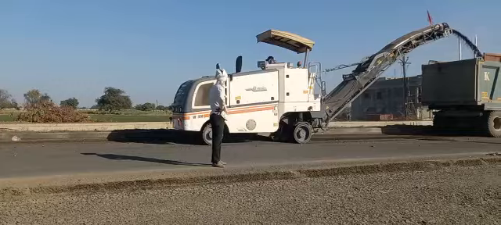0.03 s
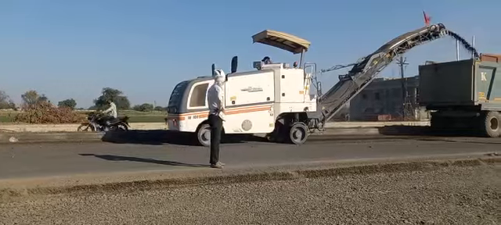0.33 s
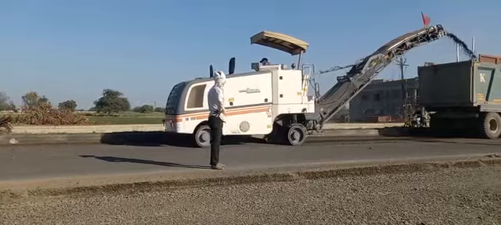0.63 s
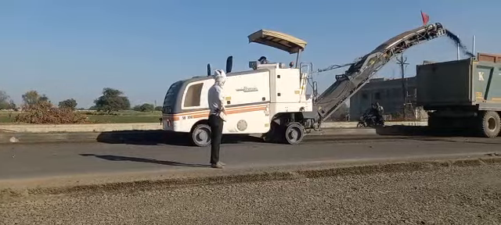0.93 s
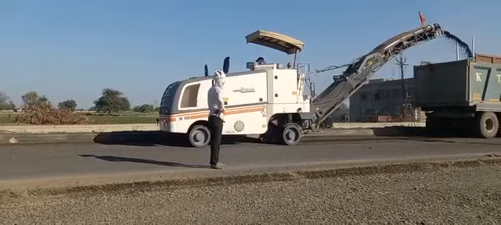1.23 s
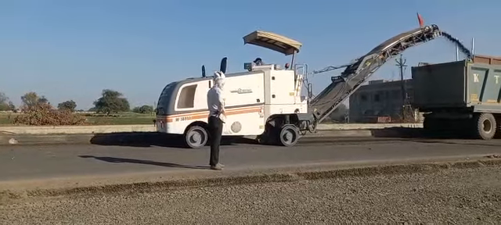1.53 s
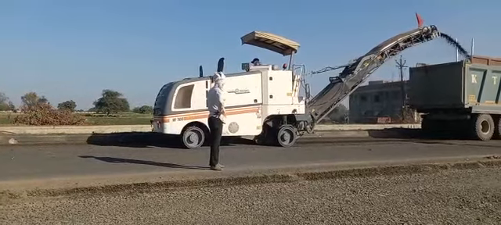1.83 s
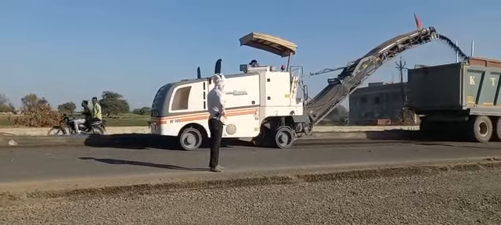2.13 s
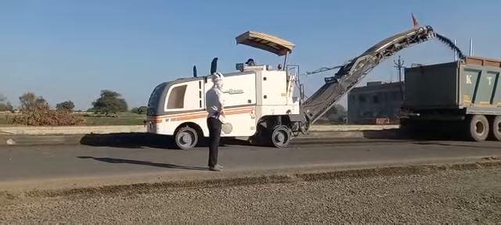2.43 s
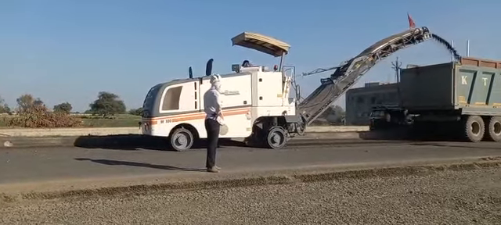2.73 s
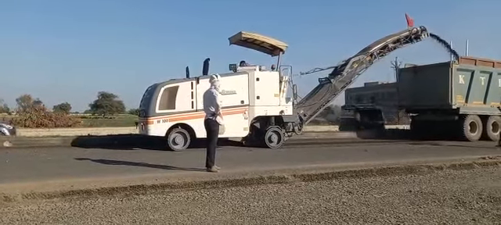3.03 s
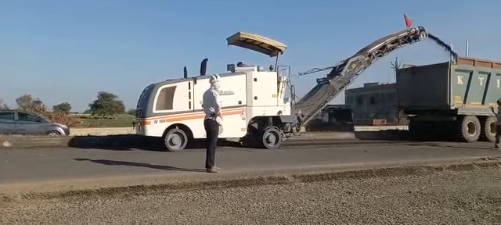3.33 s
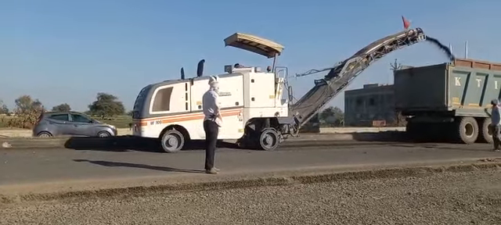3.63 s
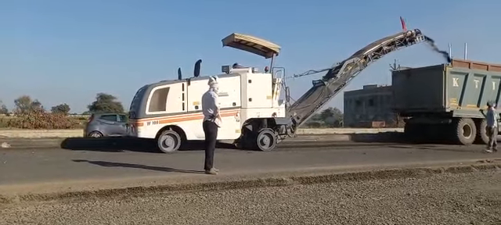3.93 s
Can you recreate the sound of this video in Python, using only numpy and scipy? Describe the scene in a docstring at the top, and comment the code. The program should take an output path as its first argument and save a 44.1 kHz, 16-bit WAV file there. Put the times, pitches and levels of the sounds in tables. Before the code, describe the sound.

Steady diesel drone and asphalt grinding from a road milling machine working outdoors.

```python
"""Road milling machine at work

Some way off in the open air, a six-cylinder diesel drones on its firing note and a fan hums above it.
The cutting drum grinds asphalt at a steady pace and the conveyor showers the crumbs into a truck,
where single stones tick. A steel part clinks once, a car passes behind and wind touches the microphone."""
import sys
import numpy as np
from scipy import signal
from scipy.fft import rfft, irfft
from scipy.io import wavfile

SR = 44100
rng = np.random.default_rng(int(sys.argv[2]) if len(sys.argv) > 2 else 0)


def to_wav(s):
    """Save 16-bit WAV."""
    ch = np.atleast_2d(s).T  # columns
    pcm = np.round(np.clip(ch, -1, 1) * 32767)  # PCM
    wavfile.write(sys.argv[1], SR, pcm.astype(np.int16))


N = 176400
T = np.arange(N) / SR
HZ = np.fft.rfftfreq(N, 1 / SR)
OCTAVE = np.log2(np.maximum(HZ, 1))


def from_db(db):
    """Decibels to gain."""
    return 10 ** (np.asarray(db) / 20)


def rms_one(x):
    """Scale to an rms of 1."""
    return x / np.sqrt(np.mean(x ** 2) + 1e-20)


def noise():
    """Two unrelated white noises."""
    return rng.standard_normal((2, N))


def drift(rate_hz):
    """Slow random motion with a spread of 1."""
    return rms_one(irfft(rfft(rng.standard_normal(N)) / (1 + (HZ / rate_hz) ** 2), N))


def pan(db):
    """Constant-power gains for a balance of left minus right in dB."""
    gains = np.array([from_db(db / 2), from_db(-db / 2)]).reshape(2, -1)
    return gains / np.sqrt(np.mean(gains ** 2, axis=0))


def colour(spectrum, skirt_db_per_octave=150):
    """An EQ curve that gives white noise a spectrum, falling steeply beyond its ends."""
    hz, db = np.transpose(spectrum)
    octaves_outside = np.abs(OCTAVE - np.clip(OCTAVE, np.log2(hz[0]), np.log2(hz[-1])))
    curve_db = np.interp(OCTAVE, np.log2(hz), db) - skirt_db_per_octave * octaves_outside
    return from_db(curve_db) * np.sqrt(SR / 2)


# The stereo image. Each row: frequency in Hz, left minus right in dB, left-right likeness from -1 to 1.
STEREO_IMAGE = [(25, -1, .97), (60, -0.5, .995), (120, -0.4, 1), (300, -0.6, .997), (700, 0.4, 0.93),
                (810, -1.5, 1), (930, -1.5, 0.64), (1130, 2, 0.89), (1400, 0.3, 0.39), (1650, 6, .6),
                (2200, 1.5, 0.84), (2670, -2.7, 0.24), (2750, 3.5, -0.2), (3320, 2.5, 0.52),
                (3600, -1.5, .35), (4150, -3, .4), (4430, 1, 0), (5100, -1.8, 0.054), (6500, -15.5, -.09),
                (7100, -17, -0.02), (7600, -9, -.1), (9200, -9.6, -.22), (11000, -2.5, -.04),
                (12200, -9.5, -.08), (14300, -10.5, -.04)]
def radiate(pair, spectrum):
    """Give two unrelated white excitations a source's spectrum and the stereo image."""
    hz, *columns = np.transpose(STEREO_IMAGE)
    balance_db, alike = [np.interp(OCTAVE, np.log2(hz), column) for column in columns]
    mid, side = rfft(pair)
    mid, side = mid * np.sqrt((1 + alike) / 2), side * np.sqrt((1 - alike) / 2)
    return irfft(np.array([mid + side, mid - side]) * colour(spectrum) * pan(balance_db), N)


def grains(per_s, spread_db, power_share):
    """Random small impacts of uneven size over a wash of countless finer ones."""
    sizes = from_db(spread_db * np.minimum(rng.exponential(1, (2, N)), 4))
    signs = rng.choice([-1, 1], (2, N))
    hits = rng.random((2, N)) < per_s / SR
    return np.sqrt(power_share) * rms_one(sizes * signs * hits) + np.sqrt(1 - power_share) * noise()


def wandering_phase(hz, wander):
    """Phase of a pitch that strays slowly; wander is its relative spread."""
    return 2 * np.pi * np.cumsum(hz * (1 + wander * drift(1))) / SR


def tones(phase, partials, flutter_hz):
    """Multiples of a base pitch, each fluttering in level and phase."""
    out = 0
    for multiple, db, flutter in partials:
        angle = multiple * phase + rng.uniform(0, 2 * np.pi)
        tone = (1 + flutter * drift(flutter_hz)) * np.sin(angle)
        phase_jitter = flutter / 2 * drift(flutter_hz) * np.cos(angle)
        out = out + from_db(db) * np.sqrt(2) * (tone + phase_jitter)
    return out


# Bell-shaped gusts. Each row: centre in seconds, half length in seconds, rms level at the crest in dB.
WIND_GUSTS = [(.66, 0.089, -33), (1.24, .06, -39), (1.82, 0.046, -30), (2.292, .035, -22),
              (2.44, 0.03, -31), (3.1, 0.089, -30), (3.55, 0.13, -34)]
# The wind's low thud. Each row: frequency in Hz, relative level in dB.
WIND_SPECTRUM = [(22, -32.5), (45, -20.5), (62, -10), (82, 0.5), (110, -8), (150, -13.5), (400, -26)]
def wind(breeze_db=-43.5):
    """Soft low buffets over a steady breeze, different at each port of the microphone."""
    gusts = sum(from_db(db) * np.exp(-.5 * ((T - s) / half) ** 2) for s, half, db in WIND_GUSTS)
    buffeting = rms_one(irfft(rfft(noise()) * colour(WIND_SPECTRUM), N))
    return buffeting * np.hypot(gusts, from_db(breeze_db))


# The car's pass-by. Each row: time in seconds, rms level in dB, added pan as left minus right in dB.
CAR_PATH = [(0, -61, -5), (2.3, -52.5, -6), (2.8, -40, -4), (3.15, -42, -4), (3.6, -42, 0), (4, -42, 3)]
# Tyres on the road. Each row: frequency in Hz, relative level in dB.
TYRE_SPECTRUM = [(900, -8.5), (1200, -3), (1750, -0.5), (2000, -6.5), (2280, 2.5), (2650, -4), (2950, -8.5),
                 (4300, -15.5)]
def car():
    """Tyre noise swells and crosses from right to left."""
    s, db, pan_db = np.transpose(CAR_PATH)
    tyres = rms_one(radiate(noise(), TYRE_SPECTRUM))
    return tyres * from_db(np.interp(T, s, db)) * pan(np.interp(T, s, pan_db))


# The steel part's resonances. Each row: frequency in Hz, width of its wander in Hz, peak level in dB.
STEEL_MODES = [(1640, 40, -30.5), (1860, 50, -38)]
def clink(start_s=.605, rise_s=.016, decay_s=.014):
    """Steel is rubbed for a moment and rings."""
    age = np.maximum(T - start_s, 0)
    envelope = np.minimum(age / rise_s, 1) * np.exp(-np.maximum(age - rise_s, 0) / decay_s)
    ringing = sum(from_db(db) * np.sin(wandering_phase(hz, width / hz / 2))
                  for hz, width, db in STEEL_MODES)
    return ringing * envelope * pan(db=-4)


# Larger stones land in the truck. Each row: start in seconds, relative level in dB.
STONE_HITS = [(.343, -40), (0.353, -46), (.414, -42), (.494, -41), (.633, -45), (.928, -44), (1.093, -42),
              (1.225, -40), (1.241, -44), (2.3, -44), (3.04, -46), (3.267, -41)]
def stones(gain_db=-5.5, decay_s=.0088, band_hz=(5500, 14000)):
    """Each larger stone lands with a short bright tick on the right."""
    envelope = sum(from_db(db + gain_db) * (T >= s) * np.exp(-np.abs(T - s) / decay_s)
                   for s, db in STONE_HITS)
    band = signal.butter(2, band_hz, "band", fs=SR, output="sos")
    return signal.sosfilt(band, noise() * (envelope + 1e-12)) * pan(db=-11.5)


# The hiss of falling grit. Each row: frequency in Hz, relative level in dB.
GRIT_SPECTRUM = [(7350, -103.3), (8200, -97.5), (9200, -93), (11200, -99.1), (12000, -99.7),
                 (13800, -103.4), (14300, -99.6), (14900, -106.2), (15600, -108.6)]
def conveyor(gain_db=-.5, flicker_db=.5, flicker_hz=12):
    """A fine shower of crumbs falls off the conveyor into the truck."""
    crumbs = grains(per_s=700, spread_db=.5, power_share=.25)
    return radiate(crumbs, GRIT_SPECTRUM) * from_db(gain_db + flicker_db * drift(flicker_hz))


# Bounces off road and steel sides. Each row: left delay in seconds, right delay in seconds, gain in dB.
REFLECTIONS = [(.0023, .0021, -21.5), (.0056, 0.0057, -16), (0.0109, 0.011, -15.5)]
def echoes(pair):
    """A few early reflections give the grinding a hollow ring."""
    out = pair
    for *delays_s, db in REFLECTIONS:
        delayed = [np.interp(T - s, T, channel, left=0) for s, channel in zip(delays_s, pair)]
        out = out + from_db(db) * np.array(delayed)
    return out


# The grinding, coloured by the housing. Each row: frequency in Hz, base level in dB per Hz.
DRUM_SPECTRUM = [(1000, -75), (1170, -61.5), (1300, -64.5), (1440, -71.5), (1600, -68), (1730, -62.5),
                 (1795, -69), (1870, -63), (2000, -74.5), (2200, -66), (2600, -70.5), (2750, -74.5),
                 (2900, -72), (3100, -74.5), (3300, -73.5), (3500, -75), (4050, -74.5), (4300, -79),
                 (4550, -74.5), (4850, -77), (5400, -76.5), (5900, -79.5), (6450, -85), (6900, -87),
                 (7300, -104)]
# How hard the drum bites. Each row: time in seconds, gain in dB.
DRUM_BITE = [(.1, -1), (.9, -0.5), (1.3, -0.3), (1.8, 0.3), (2.3, .1), (2.7, -0.5), (2.81, 0.3),
             (2.95, -0.6), (3.3, -0.4), (4, -0.2)]
def cutting_drum(flicker_db=.53, flicker_hz=14):
    """Picks chip the asphalt inside a resonant steel housing."""
    level_db = np.interp(T, *np.transpose(DRUM_BITE)) + flicker_db * drift(flicker_hz)
    chips = grains(per_s=2500, spread_db=2, power_share=.4)
    return radiate(chips, DRUM_SPECTRUM) * from_db(level_db)


# The fan's hum. Each row: multiple of the blade rate, base rms level in dB, flutter depth as a fraction.
BLADE_PARTIALS = [(1, -24.5, 0.21), (2, -40.5, .25)]
# Air rushing through the fan. Each row: frequency in Hz, base level in dB per Hz.
RUSH_SPECTRUM = [(180, -57), (225, -45), (275, -45.5), (320, -48.5), (365, -57), (410, -58.5), (445, -56),
                 (500, -64), (580, -59.5), (625, -60), (675, -58.5), (705, -53), (740, -58), (765, -57),
                 (800, -60), (835, -57), (900, -63), (1000, -71.5)]
# A gentle fader ride on hum and rush together. Each row: time in seconds, gain in dB.
FAN_RIDE = [(.1, -0.5), (.4, 0), (.7, 0.6), (1.1, 0), (1.6, -0.2), (2.2, 0), (2.6, 0), (3.1, .3),
            (3.5, -.7), (4, -0.5)]
def fan(firing_phase, blade_hz=273.6, throb_depth=.16):
    """The blades hum over a rush of air that throbs with each turn of the crank."""
    crank_phase = firing_phase / 3   # six cylinders fire three times a turn
    rush = radiate(noise(), RUSH_SPECTRUM) * (1 + throb_depth * np.sin(crank_phase))
    hum = tones(wandering_phase(blade_hz, wander=.001), BLADE_PARTIALS, flutter_hz=7.2)
    return (hum * pan(db=-.4) + rush) * from_db(np.interp(T, *np.transpose(FAN_RIDE)))


# The exhaust note. Each row: multiple of the firing rate, rms level in dB, flutter depth as a fraction.
EXHAUST_PARTIALS = [(.5, -43.5, 0.27), (1, -17.5, 0.057), (2, -36, .45)]
# The engine's low rumble. Each row: frequency in Hz, level in dB per Hz.
RUMBLE_SPECTRUM = [(22, -77), (32, -77), (45, -67.5), (70, -46.5), (90, -45), (135, -52), (180, -55)]
def diesel(firing_phase):
    """The exhaust drones on the firing note over an uneven rumble."""
    drone = tones(firing_phase, EXHAUST_PARTIALS, flutter_hz=5)
    return drone * pan(db=-.37) + radiate(noise(), RUMBLE_SPECTRUM)


def scene():
    """The whole machine at work, with a passing car and a light wind."""
    firing_phase = wandering_phase(hz=117.78, wander=.00067)   # governed at about 2350 rpm
    engine = diesel(firing_phase) + fan(firing_phase)
    milling = echoes(cutting_drum()) + conveyor() + stones() + clink()
    return engine + milling + car() + wind()


def record(dry, start_s=.067, fade_s=.001, cutoff_hz=15750):
    """The sound opens abruptly; a steep low-pass trims the very top."""
    low_pass = signal.ellip(10, .1, 80, cutoff_hz, fs=SR, output="sos")
    opening = np.clip((T - start_s) / fade_s, 0, 1)
    return signal.sosfilt(low_pass, dry * opening)


dry = scene()
out = record(dry)
to_wav(out)
```